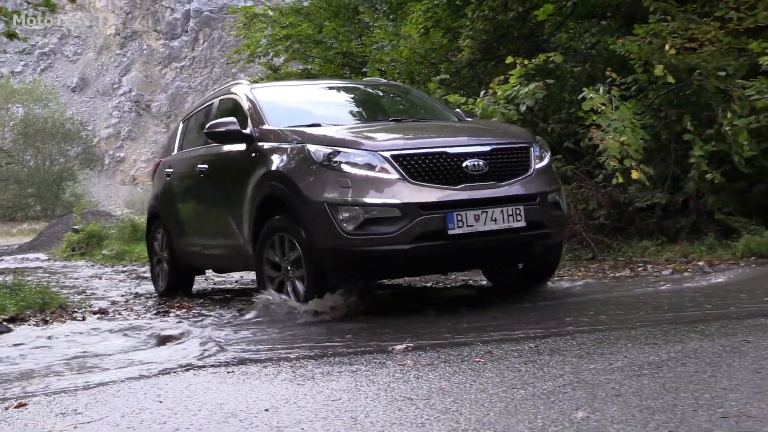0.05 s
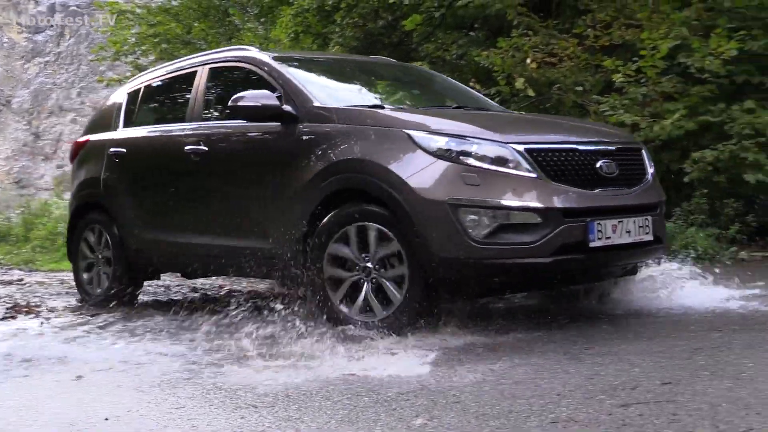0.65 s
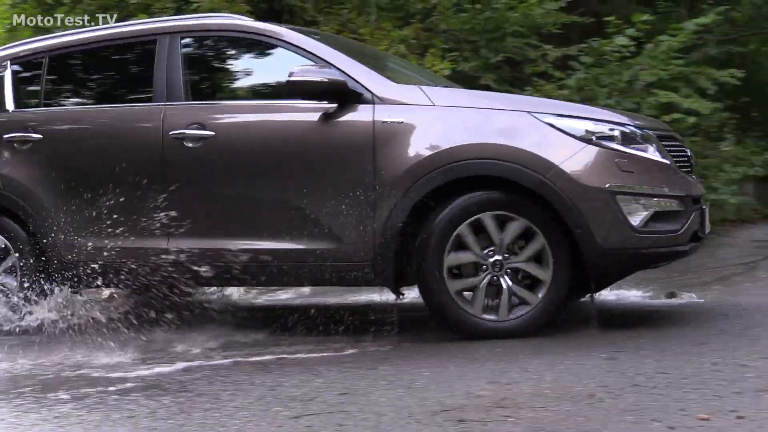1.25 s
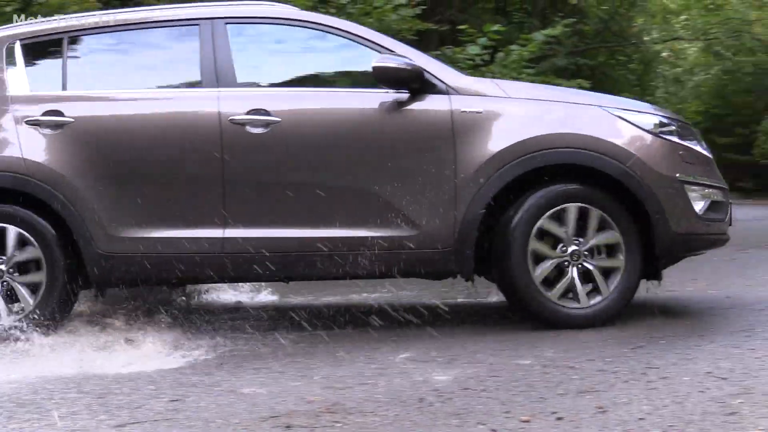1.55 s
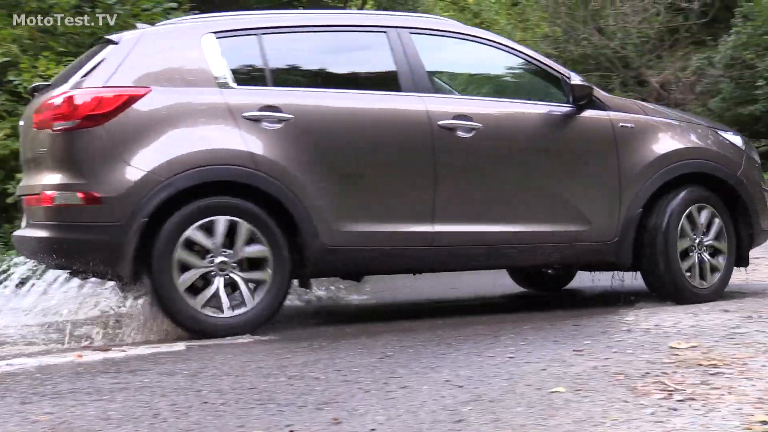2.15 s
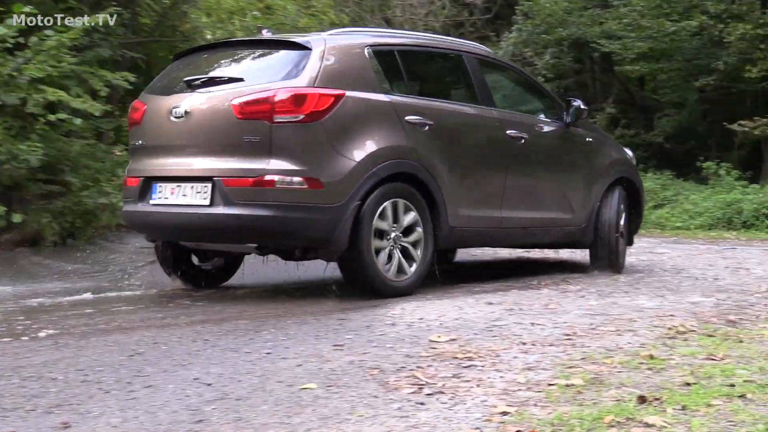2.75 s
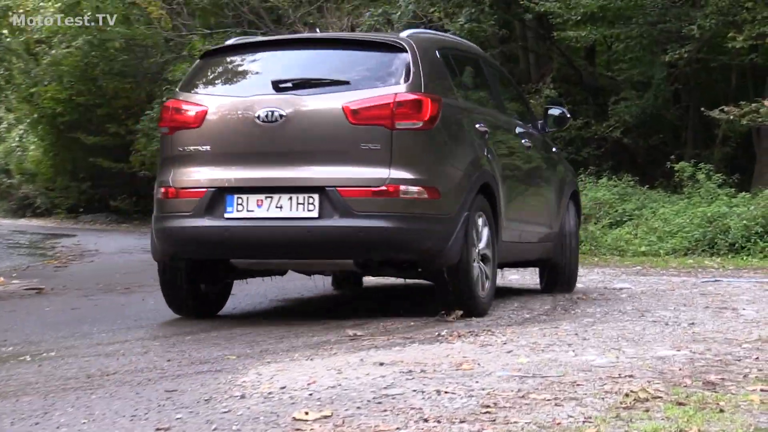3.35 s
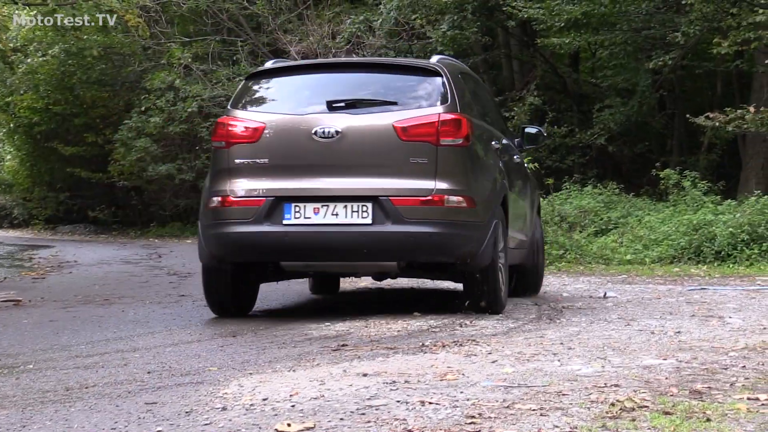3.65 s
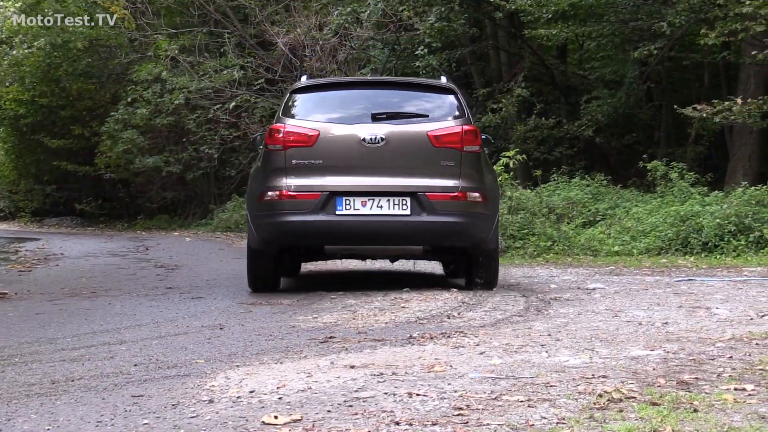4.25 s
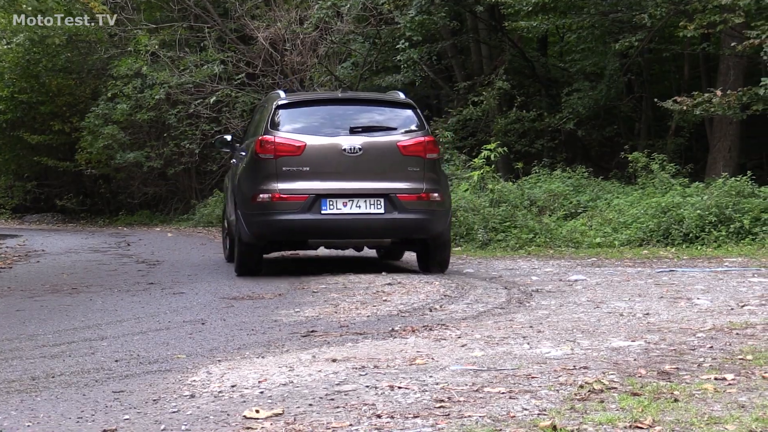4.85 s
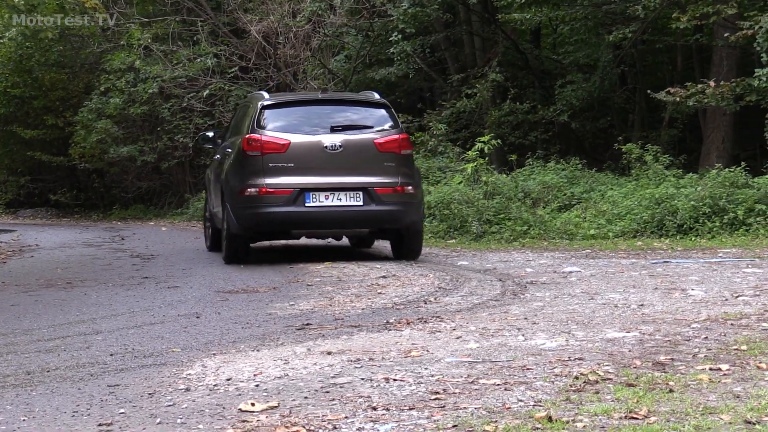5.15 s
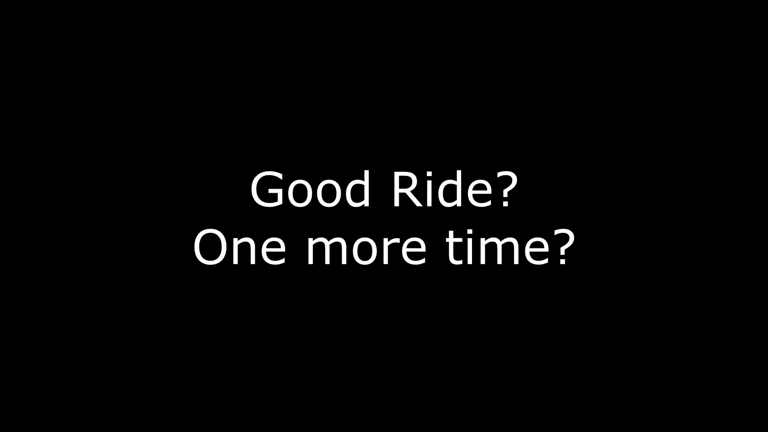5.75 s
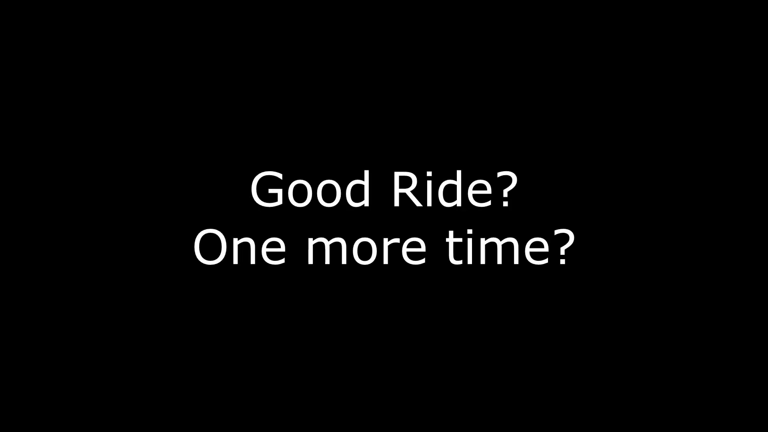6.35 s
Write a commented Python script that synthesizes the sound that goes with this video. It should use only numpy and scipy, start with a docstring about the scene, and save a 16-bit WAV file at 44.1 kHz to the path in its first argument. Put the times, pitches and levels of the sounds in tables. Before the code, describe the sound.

A diesel car is fording a shallow stream close by, outdoors, with a light breeze rumbling on the microphone throughout. From the start the exhaust booms, the engine clatters and the tyres churn sloshing, bubbling water with a few slaps and thumps. The front wheels throw spray at about 0.6 seconds and the rear wheels at about 1.5, when the engine briefly whines as it passes. The revs climb until around 2.7 seconds. At 2.4 seconds a wheel jolts out of the stream and the suspension clunks. By 3 seconds the splashing gives way to tyres crunching on wet gravel, with single stones knocking and cracking. The car grows quieter as it rolls slowly away, the engine sinking to idle near 4 seconds, then picking up slightly at about 4.5. The sound stops at 5.5 seconds.

```python
"""A diesel car fords a shallow muddy stream close by; a breeze nudges the microphone throughout.
The exhaust booms, the engine clatters, the tyres churn; front wheels (0.6 s), then rear wheels (1.5 s)
throw spray, and the engine whines as it passes. At 2.4 s a wheel jolts out and the suspension clunks.
The car rolls slowly away over wet gravel, stones knocking under the tyres. The sound cuts off at 5.5 s."""
import sys
import numpy as np
from scipy import signal
from scipy.fft import rfft, irfft, next_fast_len
from scipy.io import wavfile

SR = 44100
rng = np.random.default_rng(int(sys.argv[2]) if len(sys.argv) > 2 else 0)


def digitize_waveform(pressure):
    """Quantize a signal to 16-bit integers and store it at the path in sys.argv[1].

    Rows of a 2-D input are taken as channels; values are limited to [-1, 1].
    """
    field = np.atleast_2d(pressure).T
    bounded = np.clip(field, -1, 1)
    quanta = np.round(bounded * 32767).astype(np.int16)
    wavfile.write(sys.argv[1], SR, quanta)


N = 282234
T = np.arange(N) / SR

# Spectra. Each row: frequency in Hz, relative density in dB.
WIND_SPECTRUM = [(6, -3.5), (10, 4.5), (20, -11.5), (35, -5), (55, -24), (100, -27), (200, -31), (400, -43)]
GRIT_SPECTRUM = [(290, -44), (500, -25.5), (532, -3), (747, -1.5), (959, 2), (1150, -0.5), (1280, 1),
                 (1650, -1), (1820, -1.5), (1970, -4.5), (2130, -5), (2340, -12.5), (2540, -12.5),
                 (2820, -11), (3710, -19.5), (4160, -17.5), (4830, -24), (6530, -28.5), (10000, -55.5),
                 (13000, -72), (22000, -120)]
RUMBLE_SPECTRUM = [(50, -3), (110, 3), (170, 3), (240, 1), (330, -1.5), (450, -4.5), (600, -4), (800, -7),
                   (1200, -39.5)]
CRACKLE_SPECTRUM = [(600, -19), (820, 6), (1000, -2), (1400, -14), (1830, 10), (2100, -6), (2550, 1),
                    (3200, -18), (5000, -22), (10000, -37)]
SPRAY_SPECTRUM = [(1500, -7.5), (2300, -17), (2750, 1.5), (3300, -2.5), (4200, -3), (5500, -7), (7500, -12),
                  (10300, -18.5)]
SLOSH_SPECTRUM = [(50, 6.5), (90, 1.5), (150, 0.5), (220, -3), (310, -5.5), (390, -3), (480, -2),
                  (620, -11), (800, -23.5), (1200, -36.5)]
CHURN_SPECTRUM = [(290, -42.5), (500, -8.5), (574, -7.5), (627, -5), (785, -1.5), (1010, -4), (1800, -1),
                  (2400, -9), (2890, -11.5), (5280, -18.5), (10000, -33.5), (13000, -61.5), (22000, -120)]
# Gusts on the microphone. Each row: peak time in seconds, level in dB.
WIND_GUSTS = [(.18, -22), (1.0, -30), (3.1, -24), (4.41, -27), (5.09, -26), (5.48, -35)]
# Drops on the doors, then stones cracking. Each row: start in seconds, peak in dB, pitch in Hz.
TICK_HITS = [(.662, -29.5, 4200), (1.283, -30, 3300), (1.340, -34, 3500), (3.032, -39, 4000),
             (3.546, -39, 5500), (3.712, -32, 2600), (4.002, -44, 2700), (4.011, -38, 2800),
             (4.519, -47, 2600)]
# Underbody hum, under the bow wave, then as the engine slows.
# Each row: peak time in seconds, level in dB, rise and fall in seconds, pitch in Hz.
PANEL_SWELLS = [(.34, -27.5, 0.12, 0.12, 384), (.68, -27, 0.11, 0.086, 387.5),
                (2.78, -34, 0.18, 0.087, 593), (3.25, -42.5, 0.17, 0.27, 584)]
# Stones on the wheels. Each row: start in seconds, peak in dB, pitch in Hz.
STONE_HITS = [(3.038, -23, 985), (3.425, -33, 960), (3.512, -30.5, 1090), (3.585, -32, 620),
              (3.704, -23, 787), (4.0, -32.5, 920), (4.116, -27.5, 755), (4.44, -34.5, 1013),
              (4.515, -35, 845), (5.346, -33, 870)]
# Ring of a struck wheel. Each row: ratio to the pitch, width in Hz, relative level in dB.
WHEEL_MODES = [(1, 109, 1), (1.25, 200, -3), (2.15, 350, -10)]
# Ring of the suspension. Each row: frequency in Hz, relative level in dB, T60 in seconds.
SUSPENSION_MODES = [(374, -9, 0.032), (466.5, 0.5, 0.093), (930, -4.5, 0.071)]
# Water slaps and gravel bumps.
# Each row: start in seconds, gain in dB, pitch in Hz, relative grit in dB, T60 in seconds.
KNOCK_HITS = [(0.048, -12, 1740, -27, 0.034), (0.12, -10, 1400, -23, 0.048), (1.211, -10, 1120, -26, 0.066),
              (1.493, -22, 940, -22, 0.029), (1.826, -21.5, 1050, -32, 0.2), (2.407, -8.5, 715, -31, 0.061),
              (2.5, -12.5, 880, -35, 0.068), (3.256, -21, 326, -36, 0.055), (3.866, -37, 1400, -19, 0.16),
              (3.908, -27, 480, -30, 0.06), (3.995, -30, 1132, -15, 0.09), (5.347, -35, 1258, -31, 0.11)]
# Ruts and flung pebbles. Each row: peak time in seconds, peak in dB, pitch in Hz.
POP_HITS = [(0.069, -9.5, 153), (0.078, -19, 88), (0.182, -18, 126), (0.658, -13, 1800),
            (.914, -12.5, 1940), (1.017, -15, 90.5), (1.051, -19.5, 130), (2.965, -14.5, 1620),
            (4.41, -28, 38)]
# Tyre resonances. Each row: frequency in Hz, width in Hz, level in dB relative to the car.
TYRE_MODES = [(740, 160, -11), (960, 160, -12.5), (1790, 120, -16.5)]
# Car level: close, then farther and slower. Each row: time in seconds, car in dB, low rumble in dB.
CAR_LEVELS = [(0.0, -27, -29.5), (0.47, -27, -30.5), (0.67, -23.5, -30), (0.8, -26, -31),
              (1.54, -26.5, -31.5), (2.42, -27.5, -31.5), (2.56, -28, -31), (2.84, -32.5, -37),
              (3.3, -36, -39), (3.8, -40.5, -43), (4.15, -41, -48), (4.6, -40, -46.5), (5.1, -42, -45.5),
              (5.48, -41.5, -42.5)]
# Underbody resonances. Each row: frequency in Hz, width in Hz, gain in dB.
BODY_MODES = [(375, 16, 3.5), (490, 27, -3.5), (576, 45, -0.5), (760, 81, -9.5), (860, 45, -4),
              (1030, 82, -11.5), (1400, 180, -17.5), (1710, 250, -19.5)]
# Exhaust pipe response. Each row: frequency in Hz, gain in dB.
PIPE_RESPONSE = [(65, -4.5), (82, -8), (108, -18.5), (123, -9), (138, -3.5), (165, -6.5), (185, -6),
                 (300, -6.5)]
# Overtones: up as the tailpipe swings to the listener, down at idle. Each row: time in seconds, gain in dB.
OVERTONE_SWELL = [(0.4, -4), (0.7, 0.5), (1.2, -2), (1.6, 2), (2.05, 7), (2.35, 9.5), (2.74, 9), (2.9, 6),
                  (3.35, 9.5), (3.8, 2), (4.15, 1.5), (4.6, 8.5), (5.0, 8.5), (5.4, 3.5)]
# Speed up, lift off, one more touch of throttle. Each row: time in seconds, rate in Hz that sets # overtones
# and clatter (the boom sits 2% below it), boom in dB.
THROTTLE = [(0.0, 40.4, -22.5), (0.37, 38.7, -25.5), (0.75, 49.01, -16.5), (0.99, 45.0, -20),
            (1.26, 51.1, -18), (1.45, 51.2, -18.5), (1.71, 53.8, -19), (1.99, 55.4, -20.5),
            (2.7, 62.7, -26.5), (2.88, 56.8, -24.5), (3.11, 54.0, -25.5), (3.35, 48.0, -29),
            (3.6, 38.0, -47), (3.8, 33.65, -36), (3.96, 32.35, -42), (4.2, 31.64, -55), (4.55, 41.27, -32),
            (4.76, 40.58, -35.5), (5.1, 34.9, -32.5), (5.5, 32.7, -46)]

SHORE_S, GRAVEL_S = (2.42, 3.05), 3.8  # tyres leave the water, reach loose stones
TURN_AWAY_S, CUT_S = (3.36, 3.4), 5.513


def undb(db):
    """Decibels to gain."""
    return 10 ** (np.asarray(db) / 20)


def unit(x):
    """Scale to rms 1."""
    return x / np.sqrt(np.mean(x ** 2) + 1e-18)


def curves(table):
    """Each column, interpolated over time."""
    s, *columns = np.transpose(table)
    return [np.interp(T, s, c) for c in columns]


def noise():
    """White noise."""
    return rng.standard_normal(N)


def colour(x, spectrum):
    """Filter by (Hz, dB) points, steep beyond the ends; rms 1."""
    hz, db = np.transpose(spectrum)
    size = next_fast_len(N)
    log_f = np.log(np.maximum(np.fft.rfftfreq(size, 1 / SR), 1))
    beyond = np.maximum(np.log(hz[0]) - log_f, 0) + np.maximum(log_f - np.log(hz[-1]), 0)
    gain = undb(np.interp(log_f, np.log(hz), db) - 40 * beyond)
    return unit(irfft(rfft(x, size) * gain, size)[:N])


def band(x, hz, width_hz):
    """One resonance, gain 1 at its centre."""
    return signal.lfilter(*signal.iirpeak(min(hz, SR / 3), hz / min(width_hz, SR / 5), fs=SR), x)


def mode(x, hz, width_hz):
    """Resonance with steep skirts; rms 1."""
    return unit(band(band(x, hz, width_hz), hz, 2 * width_hz))


def walk(rate_hz):
    """Random drift, spread near 1."""
    knots = rng.standard_normal(4096)
    return np.interp(T * rate_hz, np.arange(len(knots)), knots)


def swell(peak_s, db, rise_s, fall_s):
    """Exponential rise and fall of gain."""
    return undb(db) * np.exp(-np.maximum((peak_s - T) / rise_s, (T - peak_s) / fall_s))


def decay(t, t60_s):
    """Gain falling 60 dB in t60_s."""
    return np.exp(-np.log(1000) * t / t60_s)


def add(out, start_s, x):
    """Mix x into out."""
    start = int(start_s * SR)
    out[start:start + len(x)] += x


def impacts(per_s, spread_db):
    """Random clicks, a few much larger; rms 1."""
    size = undb(spread_db * np.minimum(rng.exponential(size=N), 3.5))
    return unit((rng.random(N) < per_s / SR) * size * rng.choice([-1, 1], N))


def grains(low_hz, high_hz, cycles, rise, spread_db, count):
    """Short random rings: bubbles rise in pitch near the surface, pebbles do not."""
    out = np.zeros(N)
    for when, pitch, size, polarity in rng.random((count, 4)):
        hz, start = low_hz * (high_hz / low_hz) ** pitch, int(when * N)
        t = T[:min(int(2 * cycles / hz * SR), N - start)]
        age = t * hz / cycles
        ring = np.sin(2 * np.pi * hz * t * (1 + rise * age)) * np.exp(-np.pi * age)
        gain = undb(-spread_db * np.log(max(size, .01)))
        out[start:start + len(t)] += np.sign(polarity - .5) * gain * ring
    return unit(out)


def breeze(steady_db=-35.5):
    """Steady draught and gusts on the microphone."""
    gusts = sum(swell(s, db, rise_s=0.04, fall_s=0.16) for s, db in WIND_GUSTS)
    return colour(noise(), WIND_SPECTRUM) * np.hypot(undb(steady_db), gusts)


def ticks():
    """Big drops strike the doors, stones crack under the tyres; each rings a few cycles."""
    out, t = np.zeros(N), T[:SR // 40]
    for s, db, hz in TICK_HITS:
        burst = rng.standard_normal(len(t)) * decay(t, t60_s=0.0086)
        crack = band(band(burst, hz, hz), hz, hz)
        add(out, s, undb(db) * crack / np.abs(crack).max())
    return out


def panels():
    """Single underbody panels hum up and die away."""
    return sum(mode(noise(), hz, width_hz=30) * swell(*shape) for *shape, hz in PANEL_SWELLS)


def stones(attack_s=0.0049):
    """Stones rock under the tread and ring the wheel, each at its own pitch."""
    out, t = np.zeros(N), T[:SR // 4]
    for s, db, hz in STONE_HITS:
        scrape = rng.standard_normal(len(t)) * np.minimum(t / attack_s, 1) * decay(t, t60_s=0.056)
        ring = sum(undb(mode_db) * mode(scrape, hz * ratio, width_hz)
                   for ratio, width_hz, mode_db in WHEEL_MODES)
        add(out, s, undb(db) * ring / np.abs(ring).max())
    return out


def suspension(start_s=2.409, level_db=-16.5):
    """A rear wheel jolts out of the water; the blow rings the suspension."""
    age_s = np.maximum(T - start_s, 0)
    return sum(undb(level_db + db) * np.sin(2 * np.pi * hz * age_s) * decay(age_s, t60_s)
               for hz, db, t60_s in SUSPENSION_MODES)


def knocks(attack_s=0.011):
    """Water slaps and gravel crunches at the wheels: hollow bursts with a gritty edge."""
    out, t = np.zeros(N), T[:SR // 5]
    grit_band = signal.butter(2, [1800, 6000], "band", fs=SR, output="sos")
    for s, db, hz, grit_db, t60_s in KNOCK_HITS:
        hollow_band = signal.butter(3, [hz / 1.6, hz * 1.6], "band", fs=SR, output="sos")
        hollow = unit(signal.sosfilt(hollow_band, rng.standard_normal(len(t))))
        grit = unit(signal.sosfilt(grit_band, rng.standard_normal(len(t))))
        envelope = np.minimum(t / attack_s, 1) * decay(t, t60_s)
        add(out, s, undb(db) * (hollow + undb(grit_db) * grit) * envelope)
    return out


def pops(width_cycles=0.64):
    """Wheels drop into ruts, pebbles shoot from the tread: pulses of about one cycle."""
    out = np.zeros(N)
    for s, db, hz in POP_HITS:
        cycles = (T - s) * hz
        out += undb(db) * np.cos(2 * np.pi * cycles) * np.exp(-(cycles / width_cycles) ** 2)
    return out


def rolling(car_db, low_db):
    """Tyres crunch over grit and rumble on uneven ground."""
    pebbles = grains(724, 2200, cycles=5.8, rise=0, spread_db=0.5, count=900)
    crunch = impacts(per_s=4000, spread_db=1.1) + 0.77 * noise() + 0.11 * pebbles
    grit = colour(crunch, GRIT_SPECTRUM) * undb(car_db - 2.5 + walk(30))
    rumble = colour(noise(), RUMBLE_SPECTRUM) * undb(low_db + 3.5 + 2 * walk(40))
    return grit + rumble


def gravel(car_db, crackle_db=-14.5):
    """Loose stones crackle and ring the tyres; each resonance wavers on its own."""
    crackle = colour(impacts(per_s=70, spread_db=1.7), CRACKLE_SPECTRUM) * undb(crackle_db)
    tread = sum(undb(db + 2.5 * walk(7)) * mode(impacts(per_s=120, spread_db=1.5), hz, width_hz)
                for hz, width_hz, db in TYRE_MODES)
    return (crackle + tread) * undb(car_db) * (T >= GRAVEL_S)


def spatter(thrown, fall_s=0.0043, gain_db=-10.5):
    """Clumps of drops land on the stream, each a short fizz in one treble band."""
    out, tail = np.zeros(N), np.exp(-T[:SR // 20] / fall_s)
    for hz in np.geomspace(2800, 8000, 4):
        clumps = signal.fftconvolve(np.abs(impacts(per_s=51, spread_db=3.9)), tail)[:N]
        out += band(noise() * clumps, hz, hz / 2)
    return colour(out, SPRAY_SPECTRUM) * thrown * undb(gain_db)


def spray(thrown, wet):
    """Thrown drops patter on stream and doors; weaker ashore."""
    drops = impacts(per_s=5000, spread_db=4) * (0.45 + 0.6 * wet)
    patter = colour(drops + noise(), SPRAY_SPECTRUM) * undb(1.3 * walk(40))
    return patter * thrown * (0.5 + 0.17 * wet)


def water(car_db, low_db):
    """Tyres churn up bubbles; froth and low slosh surge together."""
    surge_db = 0.6 * walk(26) + 0.4 * walk(110)
    bubbles = grains(491.4, 4390, cycles=9.3, rise=0.08, spread_db=1.5, count=6000)
    froth = bubbles + 2.43 * impacts(per_s=6000, spread_db=3.8)
    churn = colour(froth, CHURN_SPECTRUM) * undb(car_db + surge_db)
    gurgle = grains(200, 800, cycles=10, rise=0.31, spread_db=1.5, count=900)
    slosh = colour(noise() + 0.15 * gurgle, SLOSH_SPECTRUM) * undb(low_db + 2 + surge_db)
    return churn + slosh


def wheels(car_db, low_db):
    """Wheels throw spray and climb ashore; water crossfades to ground at equal power."""
    wet = np.interp(T, SHORE_S, [1, 0])
    front_splash = swell(peak_s=0.625, db=-31, rise_s=0.22, fall_s=0.08)
    rear_splash = swell(peak_s=1.51, db=-33, rise_s=0.35, fall_s=0.29)
    thrown = np.hypot(undb(car_db - 15.5), front_splash + rear_splash)
    ford = water(car_db, low_db)
    ground = rolling(car_db, low_db)
    drops = spray(thrown, wet)
    ground += gravel(car_db)
    ford += spatter(thrown)
    return np.sqrt(wet) * ford + np.sqrt(1 - wet) * ground + drops


def tone(firings, order):
    """Sine at a multiple of the firing rate; rms 1."""
    return np.sqrt(2) * np.sin(2 * np.pi * (order * firings + rng.random()))


def exhaust(firings, firing_hz, boom_db, overtone_db, away, fall_db=7):
    """Firing pulses boom; the pipe shapes their overtones. Uneven under light load."""
    flutter_db = -0.5 * away
    boom = tone(firings, 0.98) * undb(boom_db + flutter_db * walk(22))
    gain = undb(overtone_db + (0.41 + flutter_db) * walk(15))
    overtones = np.zeros(N)
    for k in range(2, 6):
        pipe_db = np.interp(k * firing_hz, *np.transpose(PIPE_RESPONSE))
        overtones += tone(firings, k) * undb(pipe_db - fall_db * (k - 2))
    return boom + overtones * gain


def body_drone(firings, firing_hz):
    """High harmonics swell as they cross the underbody resonances."""
    grid_hz = np.arange(SR // 40)
    response = sum(undb(db) / np.hypot(1, 2 * (grid_hz - hz) / width_hz)
                   for hz, width_hz, db in BODY_MODES)
    return sum(tone(firings, k) * np.interp(k * firing_hz, grid_hz, response) * undb(3 * walk(45))
               for k in range(7, 16))


def whine(firings):
    """The engine bay whines roughly as it passes closest."""
    passing = swell(peak_s=1.55, db=-28.5, rise_s=0.046, fall_s=0.12)
    return tone(firings, order=11) * passing * undb(3 * walk(70))


def clatter(firings, fall_cycles=0.48):
    """Each firing rings the underbody with a noise burst; rms 1."""
    bursts = noise() * np.exp(-(firings % 1) / fall_cycles) * undb(2 * walk(50))
    return unit(sum(undb(db) * band(bursts, hz, width_hz) for hz, width_hz, db in BODY_MODES))


def engine(car_db, drone_db=-17.5, clatter_db=-10.5, hidden_db=-5):
    """One firing rate drives all parts; the body hides the bay once the car turns away."""
    firing_hz, boom_db = curves(THROTTLE)
    firings = np.cumsum(firing_hz * (1 + 0.002 * walk(25))) / SR
    away = np.interp(T, TURN_AWAY_S, [0, 1])
    swell_db = curves(OVERTONE_SWELL)[0]
    tailpipe = exhaust(firings, firing_hz, boom_db, car_db + swell_db, away)
    drone = body_drone(firings, firing_hz) * undb(drone_db + 0.34 * swell_db)
    bay_gain = undb(car_db + hidden_db * away)
    return tailpipe + whine(firings) + (drone + clatter(firings) * undb(clatter_db)) * bay_gain


def scene():
    """Car, water, stones and breeze; mono."""
    car_db, low_db = curves(CAR_LEVELS)
    car = engine(car_db) + wheels(car_db, low_db) + panels()
    hits = knocks() + pops() + stones() + ticks() + suspension()
    return (car + hits + breeze())[None]


def record(dry):
    """Abrupt stop, steep low-pass."""
    fade_s, top_hz = 0.003, 10150
    gate = np.clip((CUT_S - T) / fade_s, 0, 1)
    return signal.sosfilt(signal.ellip(10, .2, 80, top_hz, fs=SR, output="sos"), dry * gate)


dry = scene()
out = record(dry)
digitize_waveform(out)
```